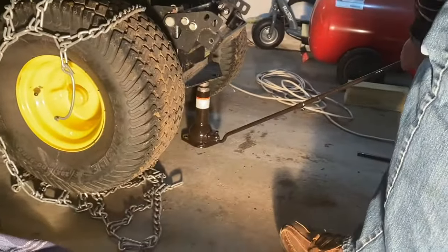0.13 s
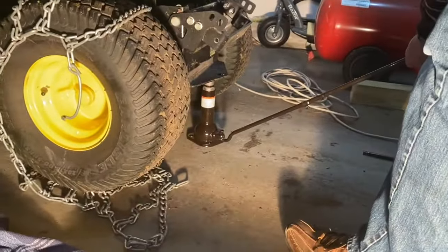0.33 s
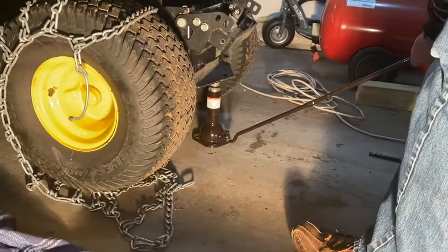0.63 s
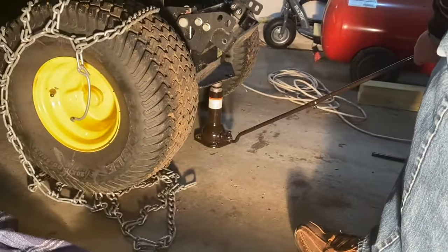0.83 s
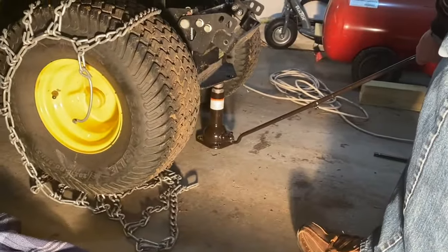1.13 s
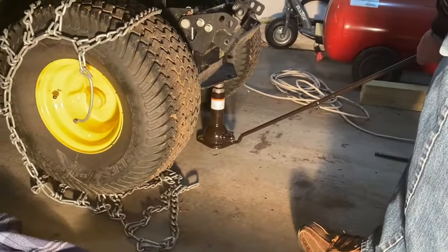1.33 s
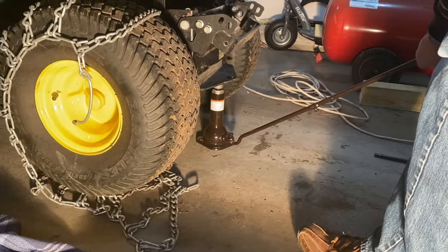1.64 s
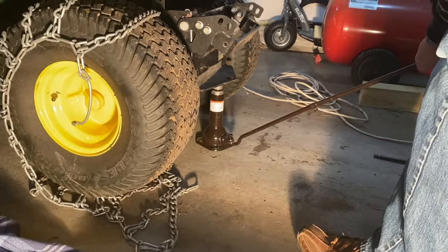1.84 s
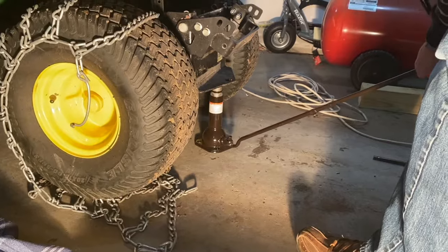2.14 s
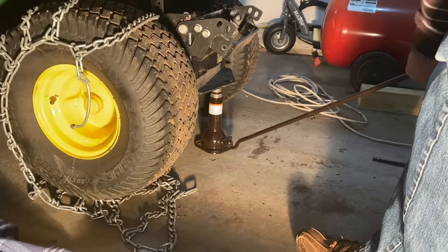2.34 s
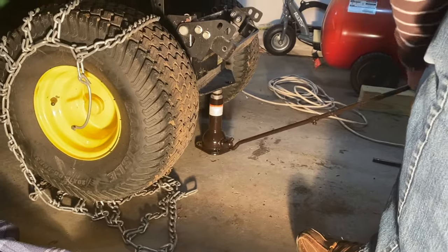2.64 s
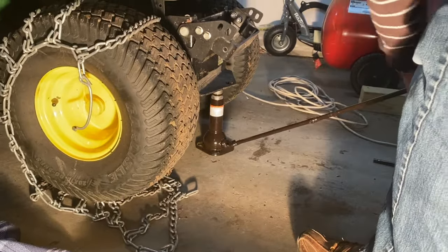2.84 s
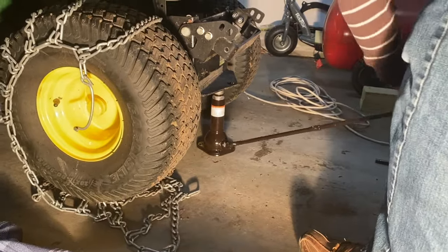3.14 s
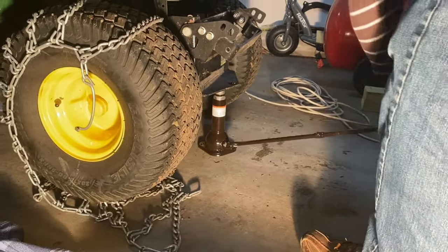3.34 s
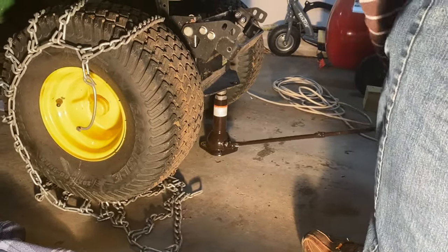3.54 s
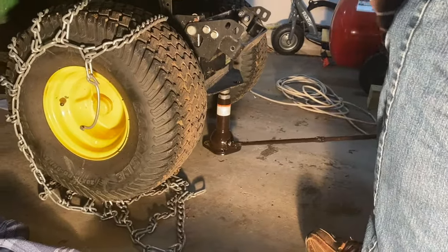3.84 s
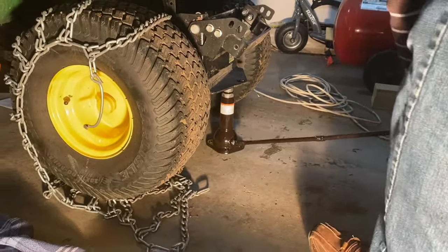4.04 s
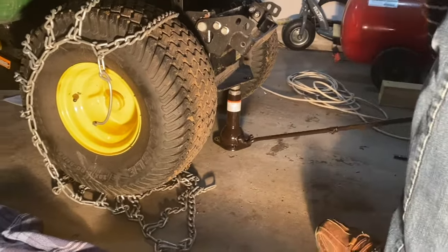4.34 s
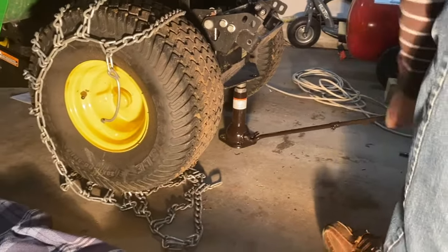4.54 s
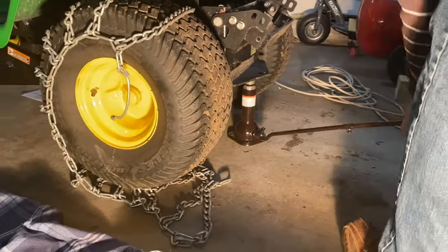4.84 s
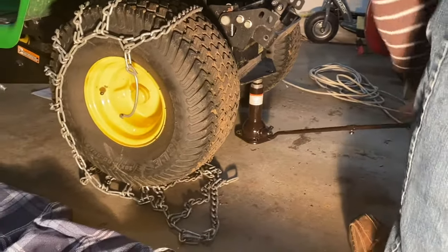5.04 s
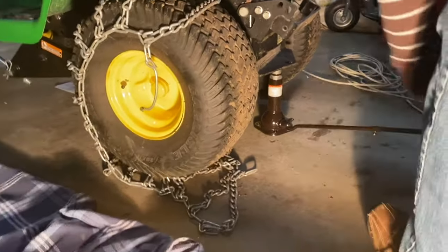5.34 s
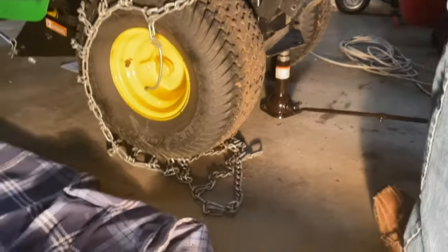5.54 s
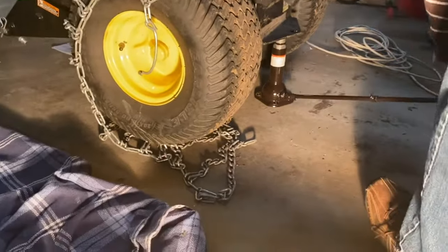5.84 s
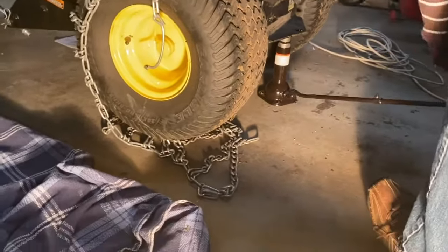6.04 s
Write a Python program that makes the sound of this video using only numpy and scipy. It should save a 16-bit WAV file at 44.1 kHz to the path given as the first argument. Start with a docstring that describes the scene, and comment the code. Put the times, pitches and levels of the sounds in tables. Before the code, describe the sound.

Close, uneven metallic knocks ring from a jack's loose handle in an open garage, with faint creaking and rustling clothes over a low hum.

```python
"""A bottle jack under a lawn tractor, pumped with a long steel rod, close to a stereo microphone.
The loose rod clicks and clanks in its socket as each stroke turns, and the piston rubs and creaks.
The place is an open garage, and its concrete and walls ring on behind every knock.
By the jack a shoe scuffs and slides, feet land softly and clothes rustle, over a low, steady hum."""
import sys
import numpy as np
from scipy import signal
from scipy.fft import rfft, irfft, next_fast_len
from scipy.io import wavfile
from scipy.ndimage import uniform_filter1d

SR = 44100
rng = np.random.default_rng(int(sys.argv[2]) if len(sys.argv) > 2 else 0)


def materialize(psi):
    """Save the field psi as 16-bit PCM at rate SR to the path in sys.argv[1].

    A 1-D psi becomes a single channel; in a 2-D psi each row is a channel.
    """
    bounded = np.clip(np.atleast_2d(psi).T, -1, 1)
    quanta = np.round(bounded * 32767).astype(np.int16)
    wavfile.write(sys.argv[1], SR, quanta)


N = 272317
TIME = np.arange(N) / SR

# knocks of the loose rod, and one click of grit under the shoe at 4.62 s:
# start_s, contact_decay_ms, level_db, brightness_db_per_octave, socket_share (0 body, 1 socket), room_db
KNOCKS_AND_CLICKS = [ (-.035, 3.4, -14.5, -0.6, 0.27, 7.5), (.392, 1.1, -15.5, -5.5, 0.27, -2.5),
                     (.499, 0.54, -41, 3, 0.5, 4.5), (0.992, 9.1, -12, -1, 0, -3),
                     (1.3, 2.8, -36.5, 4, 0.76, 2.5), (1.38, 3.37, -13, -0.2, 0.76, 1),
                     (1.536, 3, -26.5, -6, .2, 2), (1.776, 4.5, -18, 6, 0.94, 11.5),
                     (1.7815, 0.77, -4.5, 2, 1, 6.5), (1.992, 2, -29, 3.5, 0.7, -1),
                     (2.045, 1.9, -19.5, -1, 0.35, 1.5), (2.105, 1.8, -19, -1.8, 0.6, 2),
                     (2.209, 1.55, -27.5, 0.7, 0.3, -3.5), (2.99, 4.3, -26, -1, .1, 2),
                     (3.143, 2.7, -28, -8, 0.5, -1.5), (3.205, 3.7, -27, 0, .8, -1),
                     (3.222, 4.7, -21.5, 3, 0.26, 0), (3.318, 5.3, -26.5, 3, 0.6, -7),
                     (3.458, 3.1, -18, 0, 0.9, 4.5), (3.483, 4.94, -4.5, 0.55, 0.66, -6),
                     (4.006, 1.9, -16, -4.5, 0.2, 0.5), (4.0194, 3.88, 2.8, 1.1, 0.16, -1),
                     (4.6182, 0.92, -29, 2, 0, 6), (5.005, 2.8, -27, -3.5, 1, 4),
                     (5.12, 5.7, -14.5, 0.3, 0.84, -21), ]
# how the steel radiates: frequency_hz, gain_db
STEEL_COLOUR = [(40, -37.5), (170, -10.5), (300, -0.5), (390, -5.5), (560, -1), (720, -2), (1000, -0.5),
                (1450, 2), (2200, -4), (3000, -6), (4300, -3), (5600, -1.5), (8000, -2), (9300, 1),
                (14000, 1.5)]
# the range that a knock's brightness tilts: low_hz, pivot_hz, high_hz
BRIGHTNESS_BAND = (360, 1590, 10000)
# socket and linkage ring high, narrow modes on broad, damped ones: pitch_hz, gain_db, t60_s
SOCKET_MODES = [ (1870, 5, .15), (3730, 3, .35), (4968, 4, .4), (5011, 10, .6), (5668, 4, .35),
                (5945, 9, .5), (6057, 3, .3), (10034, 11, .35), (10737, 7, .25), (11339, 10, .17),
                (13880, 9, .2), (3480, 3.5, 0.031), (4670, -4, 0.012), (5125, 3, 0.0089), (6000, 2.5, .016),
                (6640, 2.5, 0.008), (8040, -6, 0.048), (10400, 2, .026), (14000, 2, .014), ]
# jack body and long rod ring lower and hollow: pitch_hz, gain_db, t60_s
BODY_MODES = [ (516, 15, .55), (693, 14.5, .5), (1735, 5, .3), (2783, 4, .4), (2846, 7, .4),
              (747.4, -3.5, 0.03), (1120, -5, .025), (1455, 2.5, .04), (1993, -5, .016), (2560, 1.5, 0.012),
              (2933, -1, 0.011), (3487, 0, 0.0071), (4020, -2.5, 0.0064), (7800, 6.5, .022),
              (10430, -1, .026), (13650, 4.5, .014), ]

# the jack's piston rubbing and creaking (first two rows), then shoe scuffs: start_s, length_s, level_db
RUBS_AND_SCUFFS = [(0, .8, -68.5), (0.916, .14, -57.5), (2.991, 0.23, -70), (3.665, .17, -64),
                   (4.458, 0.23, -48), (4.875, 0.052, -54.5), (5.006, 0.09, -63)]
# spectrum of the rubbing and scuffing: frequency_hz, gain_db
RUB_COLOUR = [(100, -20), (250, -1.5), (370, 1), (480, 5.5), (750, 6), (1100, -1.5), (1500, 5), (2400, -3),
              (3300, -15), (4500, -16), (7000, -31), (15000, -42.5)]
# hissing swells of clothes brushing and, the two loudest, a shoe sole sliding: middle_s, width_s, level_db
HISS_SWELLS = [(0, 0.16, -50.5), (2.71, 0.1, -69), (3.031, .08, -68), (3.718, 0.27, -68),
               (4.613, 0.22, -52.5), (4.822, 0.11, -62.5), (5.197, 0.17, -62.5), (5.519, 0.12, -68),
               (5.779, 0.056, -71), (5.95, 0.073, -68), (6.065, 0.027, -72), (6.17, 0.044, -67)]
# faint rustle as the body shifts between swells: time_s, level_db
CLOTH_STIRRING = [(1.0, -90), (2.6, -81.5), (4.0, -74), (5.0, -73.5), (5.35, -81.5), (6.17, -75)]
# spectrum of the cloth and sole hiss: frequency_hz, gain_db
HISS_COLOUR = [(200, -6), (1000, 4), (2500, 3.5), (4500, 1), (7000, 1.5), (8700, -5), (10500, 2),
               (12200, -21.5), (14000, 6), (16000, -20.5)]
# spectrum of the room tone: frequency_hz, gain_db
HUM_COLOUR = [(22, -31.5), (48, -4.5), (72, -0.5), (130, -6), (170, 0.5), (205, -13), (280, -8), (400, -14),
              (650, -19), (950, -22.5), (1250, -21.5), (1480, -12.5), (2000, -31.5), (4000, -45.5),
              (15000, -58)]
# soft steps on the floor: start_s, level_db, pitch_hz, t60_s
FOOTFALLS = [(0.544, -42, 108, 0.06), (2.201, -52, 54.4, 0.16), (2.839, -47.5, 200, 0.022),
             (4.22, -48.5, 52.4, 0.24), (5.126, -40, 106, 0.066)]
PING_HZ = 10430
# the shrill ping from one hard catch of the rod: start_s, level_db, pitch_hz, t60_s
PINGS = [(1.7816, -14, PING_HZ, .026)]

# how long the garage rings: frequency_hz, t60_s
GARAGE_DECAY = [(150, 1.14), (700, 0.62), (2000, 0.63), (5000, 0.6241), (8000, 0.4136), (14000, 0.13)]
# spectrum of that ring: frequency_hz, gain_db
GARAGE_COLOUR = [(100, 9), (500, 5), (1200, -1), (3000, 2.5), (5200, -1), (7500, -2), (10500, 0),
                 (14000, -3.5)]
# how alike diffuse sound is on the two sides of the microphone: frequency_hz, correlation
STEREO_LIKENESS = [(60, 0.95), (300, .8), (700, 0.68), (1500, 0.25), (4000, 0.11), (14000, 0.047)]


def from_db(db):
    """Decibels to gain."""
    return 10 ** (np.asarray(db) / 20)


def unit_rms(x):
    """Scale to unit rms."""
    return x / np.sqrt(np.mean(x ** 2) + 1e-20)


def at_hz(points, hz):
    """Read a table on a log-frequency axis."""
    known_hz, values = np.transpose(points)
    return np.interp(np.log(np.maximum(hz, 1)), np.log(known_hz), values)


def flicker(per_s):
    """Random wavering of spread about 1."""
    return np.interp(TIME * per_s, np.arange(N // 10), rng.standard_normal(N // 10))


def add(out, start_s, sound):
    """Mix a stereo sound in at start_s."""
    start = round(start_s * SR)
    part = sound[:, max(-start, 0):N - start]
    out[:, max(start, 0):max(start, 0) + part.shape[1]] += part


def diffuse_noise(colour, size):
    """Coloured noise from all round the microphone: left and right alike in the bass, not in the treble."""
    white = rng.standard_normal((2, 2 * next_fast_len(size // 2 + 1)))
    hz = np.fft.rfftfreq(white.shape[1], 1 / SR)
    mid, side = rfft(white)
    alike = np.clip(at_hz(STEREO_LIKENESS, hz), 0, 1)
    pair = np.sqrt((1 + alike) / 2) * mid + np.sqrt((1 - alike) / 2) * side * [[1], [-1]]
    return irfft(pair * from_db(at_hz(colour, hz)))[:, :size]


def minimum_phase(gain_db):
    """Causal impulse response with the given gain in each bin."""
    cepstrum = irfft(np.log(from_db(gain_db)))
    half = len(cepstrum) // 2
    cepstrum[1:half] *= 2
    cepstrum[half + 1:] = 0
    return irfft(np.exp(rfft(cepstrum)))


def mode_bank(modes, size=32768):
    """Spectrum of each steel mode: a two-pole resonance peaking at its gain_db."""
    click, spectra = signal.unit_impulse(size), []
    for pitch_hz, gain_db, t60_s in modes:
        radius = from_db(-60 / (t60_s * SR))
        zeros = np.array([1, 0, -1]) * (1 - radius ** 2) / 2
        poles = [1, -2 * radius * np.cos(2 * np.pi * pitch_hz / SR), radius ** 2]
        spectra.append(from_db(gain_db) * rfft(signal.lfilter(zeros, poles, click)))
    return np.array(spectra)


def blow_colour(hz, contact_ms, brightness, corner_hz_ms=17200, dulling_db_per_octave=14.5):
    """Spectrum of a blow in dB: tilted by its brightness, and duller the longer the contact lasts."""
    low_hz, pivot_hz, high_hz = BRIGHTNESS_BAND
    hz = np.clip(hz, low_hz, high_hz)
    octaves_past_corner = np.log2(1 + (hz * contact_ms / corner_hz_ms) ** 6) / 6
    return brightness * np.log2(hz / pivot_hz) - dulling_db_per_octave * octaves_past_corner


def steel_ring(contact_ms, brightness, socket_share, socket, body, crack_db=-3, scatter_db=2, size=32768):
    """One clean blow: a broad crack plus socket and body modes, struck a little differently each time."""
    hz = np.fft.rfftfreq(size, 1 / SR)
    crack = minimum_phase(at_hz(STEEL_COLOUR, hz) + blow_colour(hz, contact_ms, brightness))
    body_share = 1 - socket_share + 0.21 * socket_share   # a blow on the socket still shakes the body
    modes = np.vstack([socket_share * socket, body_share * body])
    strengths = from_db(scatter_db * rng.standard_normal(len(modes)))
    return irfft(rfft(crack) * (from_db(crack_db) + strengths @ modes))


def chatter(contact_ms, rise_ms=1.0, grit_db=2, size=2048):
    """Hard surfaces skid for a few milliseconds: a rough force of unit energy with an even spectrum."""
    ms = 1000 * np.arange(size) / SR
    envelope = (1 - np.exp(-ms / rise_ms)) * np.exp(-ms / contact_ms)
    force = rng.standard_normal(size) * from_db(grit_db * rng.standard_normal(size)) * envelope
    for _ in range(4):   # even out the spectrum, then restore the envelope
        even = irfft(np.exp(1j * np.angle(rfft(force))))
        force = envelope * even / np.sqrt(uniform_filter1d(even ** 2, size=64) + 1e-12)
    return force / np.linalg.norm(force)


def knocks_and_clicks(room, pan_db=0.5, slab_db=-16, trim_db=-1):
    """Rod knocks and a grit click reach the microphone directly, left first, and again off the walls."""
    out = np.zeros((2, N))
    socket, body = mode_bank(SOCKET_MODES), mode_bank(BODY_MODES)
    for start_s, contact_ms, level_db, brightness, socket_share, room_db in KNOCKS_AND_CLICKS:
        ring = from_db(level_db) * steel_ring(contact_ms, brightness, socket_share, socket, body)
        force = chatter(contact_ms)
        off_slab = from_db(slab_db) * chatter(2 * contact_ms)   # faint, smeared echo from the floor
        left, right = force + off_slab, np.roll(force, 1) - off_slab
        forces = np.array([left, right]) * from_db([[pan_db], [-pan_db]])
        add(out, start_s, signal.fftconvolve(ring[None], forces, axes=1))
        add(out, start_s, from_db(room_db) * signal.fftconvolve(ring[None], room, axes=1))
    return from_db(trim_db) * out


def garage(build_s=0.0045, early_db=-3, early_s=0.01, size=44100):
    """Concrete and walls answer with strong early reflections, then a tail whose treble dies first."""
    t, hz = np.arange(size) / SR, np.fft.rfftfreq(size, 1 / SR)
    spectrum = rfft(diffuse_noise(GARAGE_COLOUR, size))
    bands_hz, decays_s = np.transpose(GARAGE_DECAY)
    tail = 0
    for t60_s, this_band in zip(decays_s, np.eye(len(bands_hz))):
        share = at_hz(np.column_stack([bands_hz, this_band]), hz)
        tail = tail + irfft(spectrum * share, size) * from_db(-60 * t / t60_s)
    build_up = 1 - np.exp(-t / build_s)
    early_lift = 1 + from_db(early_db) * np.exp(-t / early_s)
    return from_db(-29.0) * tail * build_up * early_lift   # scaled to about unit energy


def friction(gain, colour, room, grain_db, grains_per_s, catch_db, room_db):
    """Rubbing surfaces slip in tiny grains and catch now and then; the garage smears them."""
    noise = diffuse_noise(colour, N)
    roughness = from_db(grain_db * flicker(grains_per_s) + catch_db * flicker(60))
    rub = gain * unit_rms(noise * roughness)
    return rub + from_db(room_db) * signal.fftconvolve(rub, room, axes=1)[:, :N]


def piston_rubs_and_shoe_scuffs(room, attack_s=0.017, release_s=0.024, swell_db=2.5):
    """The piston rubs and creaks, a shoe scuffs the floor: each stroke bites, presses harder, lets go."""
    gain = 0
    for start_s, length_s, level_db in RUBS_AND_SCUFFS:
        age_s = TIME - start_s
        bite = np.clip(age_s / attack_s, 0, 1)
        swell = from_db(level_db + swell_db * (np.clip(age_s / length_s, 0, 1) - 1))
        release = np.exp(-np.maximum(age_s - length_s, 0) / release_s)
        gain = gain + bite * swell * release
    return friction(gain, RUB_COLOUR, room, grain_db=-1, grains_per_s=140, catch_db=4.1, room_db=-9)


def cloth_and_sole_hiss(room):
    """Clothes brush and a shoe sole slides in bell-shaped swells of hiss, over a faint stirring."""
    swells = [from_db(level_db) * 0.5 ** np.minimum((2 * (TIME - middle_s) / width_s) ** 2, 20)
              for middle_s, width_s, level_db in HISS_SWELLS]
    stirring = from_db(np.interp(TIME, *np.transpose(CLOTH_STIRRING)))
    gain = np.linalg.norm(swells + [stirring], axis=0)   # they add in power
    return friction(gain, HISS_COLOUR, room, grain_db=2, grains_per_s=1300, catch_db=3, room_db=-10)


def room_hum(level_db=-60.5, waver_db=1.48):
    """Room tone all round the microphone: a low hum with a thin whirr and faint hiss on top."""
    return unit_rms(diffuse_noise(HUM_COLOUR, N)) * from_db(level_db + waver_db * flicker(8.7))


def damped_tones(rows):
    """Single resonances, each struck once and dying quickly, the same left and right."""
    out, t = np.zeros((2, N)), np.arange(SR // 2) / SR
    for start_s, level_db, pitch_hz, t60_s in rows:
        tone = np.sin(2 * np.pi * pitch_hz * t) * from_db(level_db - 60 * t / t60_s)
        add(out, start_s, np.tile(tone, (2, 1)))
    return out


def footfalls():
    """A foot lands softly: a low thump, gone within a few cycles."""
    return damped_tones(FOOTFALLS)


def rod_ping():
    """A hard catch of the rod sets off one very short, shrill resonance."""
    return damped_tones(PINGS)


def scene():
    """The jack and the person working it, with hum and footfalls a little right of centre."""
    room = garage()
    rubs, hiss = piston_rubs_and_shoe_scuffs(room), cloth_and_sole_hiss(room)
    knocks = knocks_and_clicks(room) + rod_ping()
    lean_right = from_db([[-0.65], [0.65]])
    return knocks + rubs + hiss + (room_hum() + footfalls()) * lean_right


def record(dry, cutoff_hz=15500):
    """The microphone chain cuts the top treble steeply."""
    return signal.sosfilt(signal.ellip(10, 0.1, 80, cutoff_hz, fs=SR, output="sos"), dry)


dry = scene()
out = record(dry)
materialize(out)
```